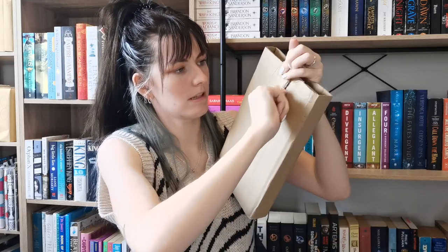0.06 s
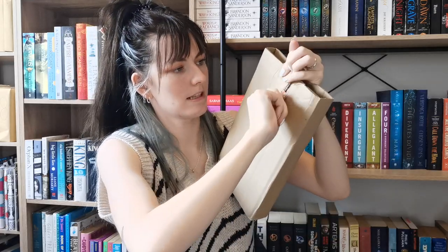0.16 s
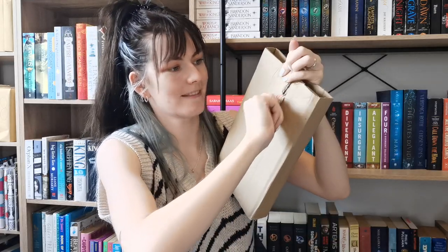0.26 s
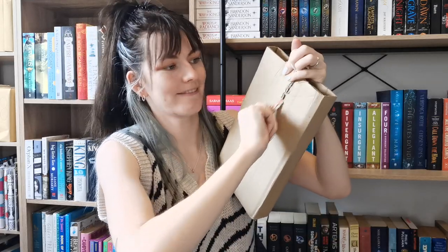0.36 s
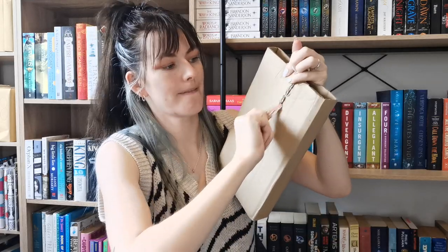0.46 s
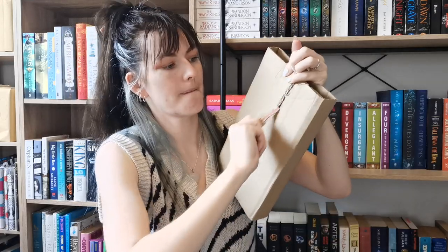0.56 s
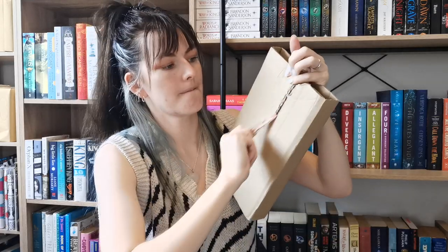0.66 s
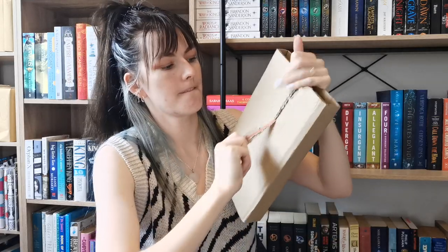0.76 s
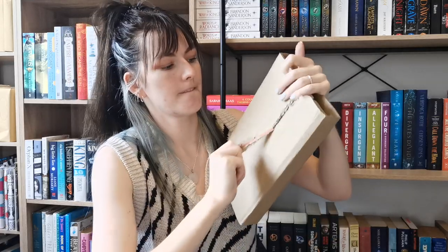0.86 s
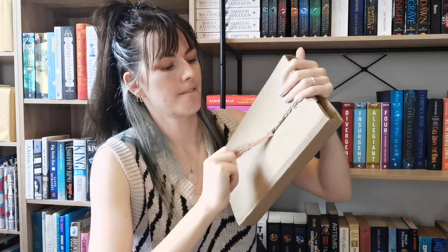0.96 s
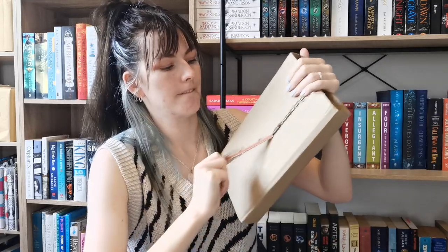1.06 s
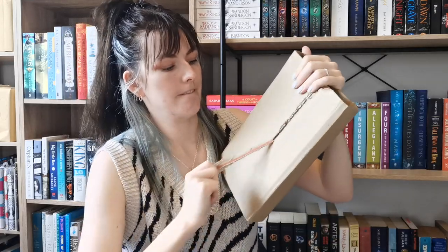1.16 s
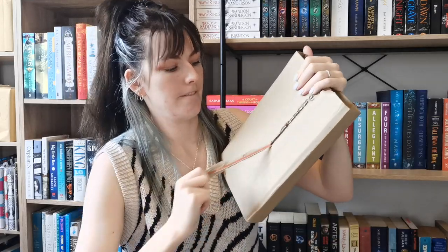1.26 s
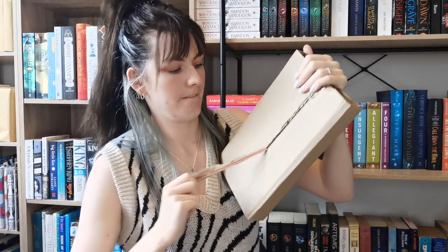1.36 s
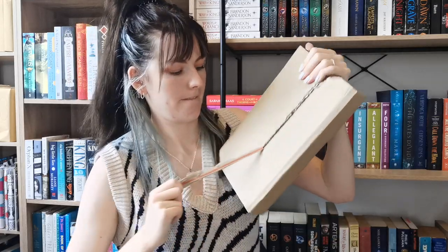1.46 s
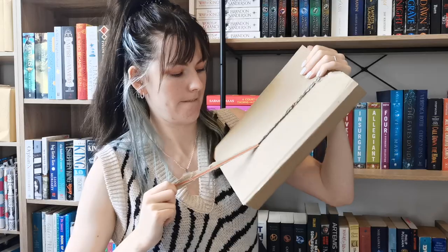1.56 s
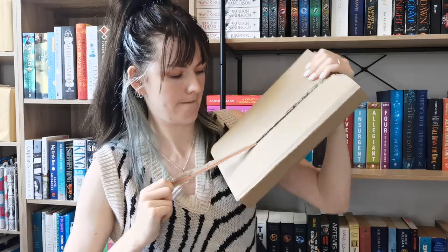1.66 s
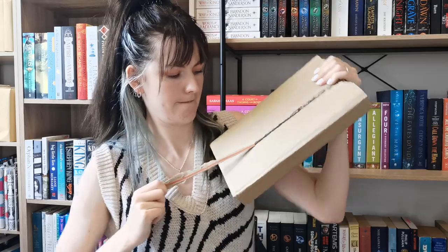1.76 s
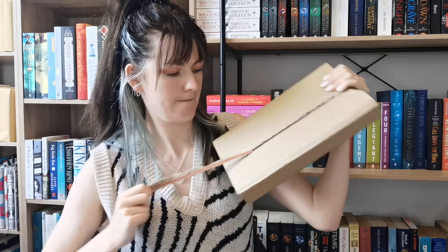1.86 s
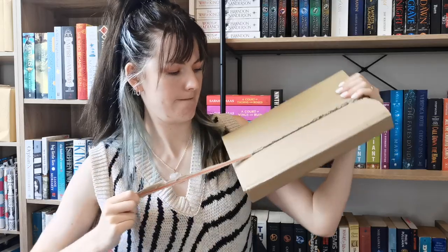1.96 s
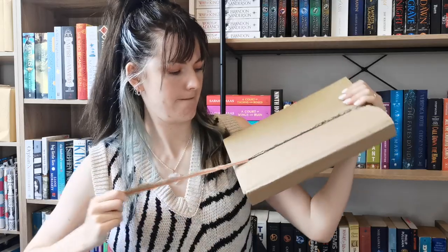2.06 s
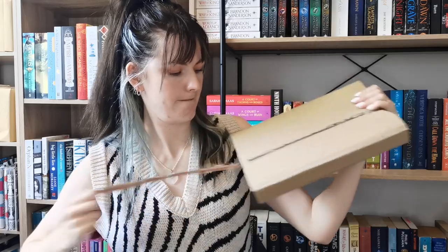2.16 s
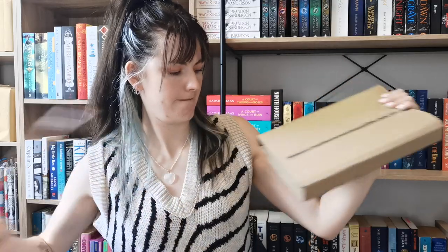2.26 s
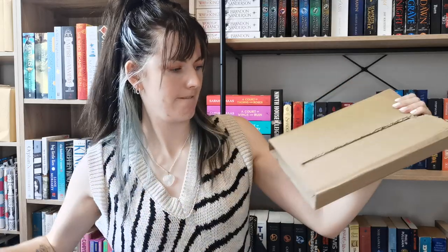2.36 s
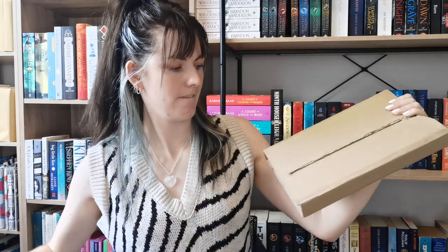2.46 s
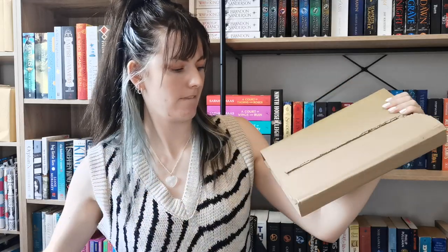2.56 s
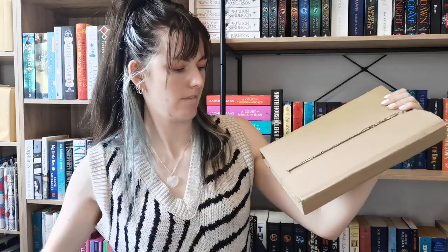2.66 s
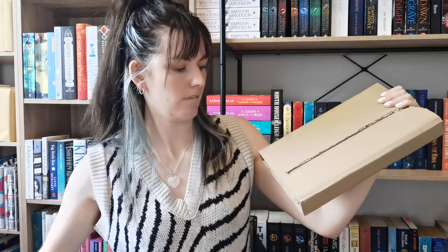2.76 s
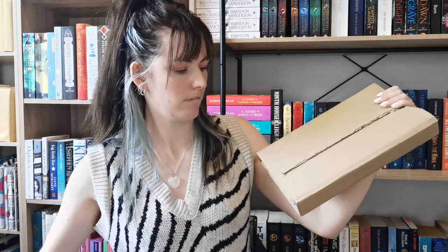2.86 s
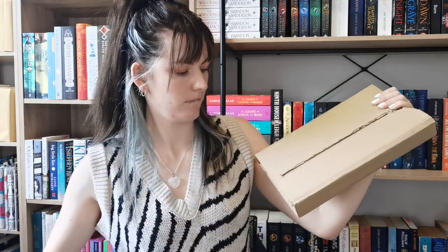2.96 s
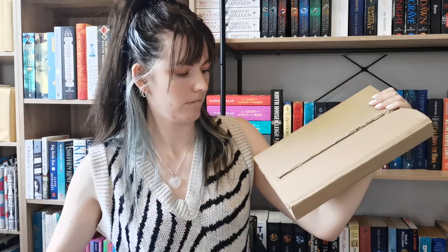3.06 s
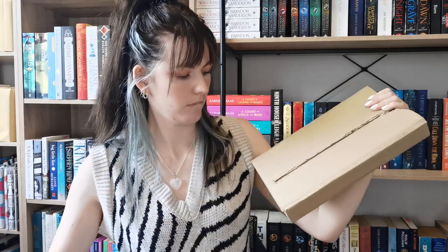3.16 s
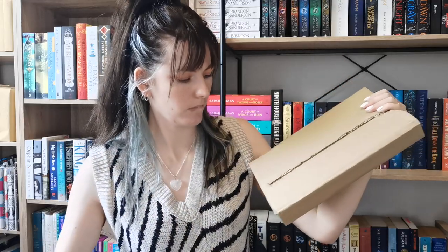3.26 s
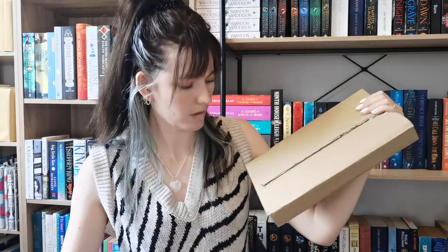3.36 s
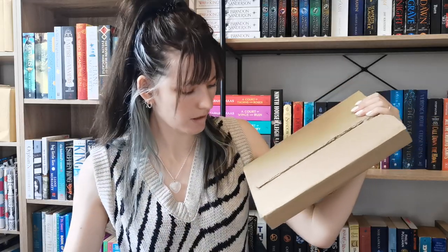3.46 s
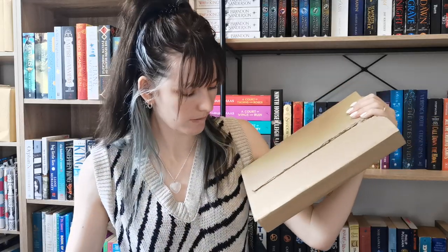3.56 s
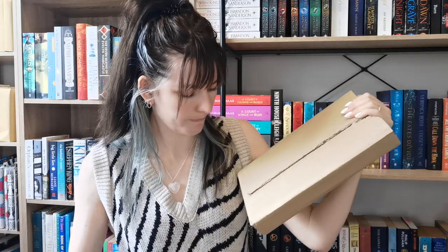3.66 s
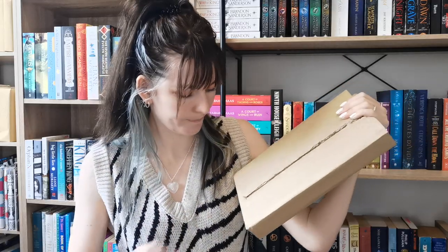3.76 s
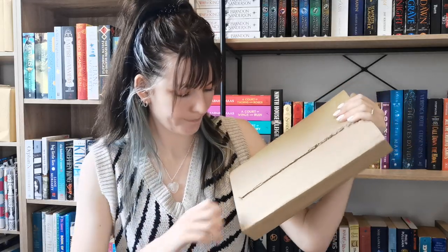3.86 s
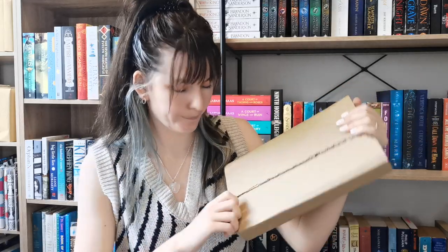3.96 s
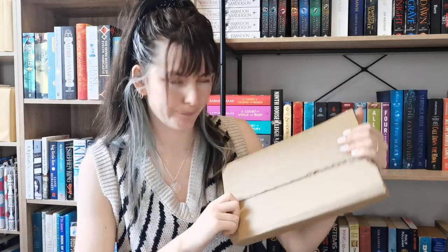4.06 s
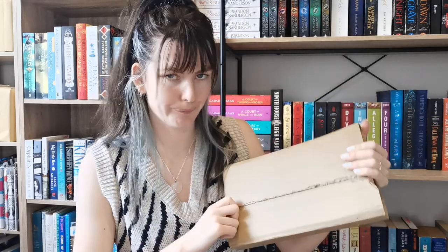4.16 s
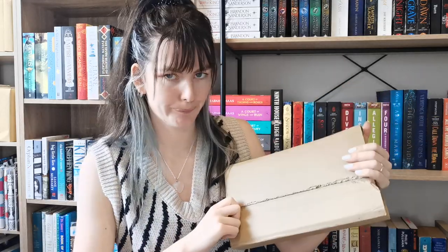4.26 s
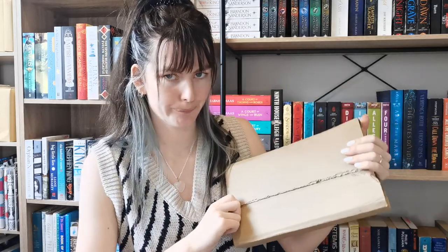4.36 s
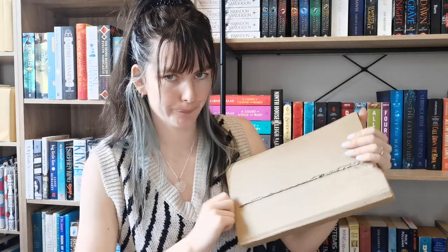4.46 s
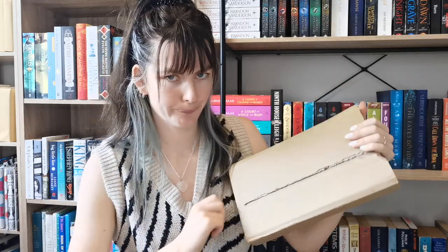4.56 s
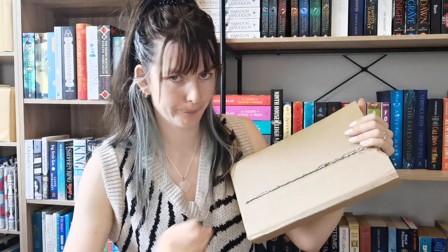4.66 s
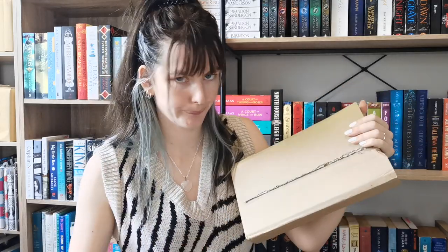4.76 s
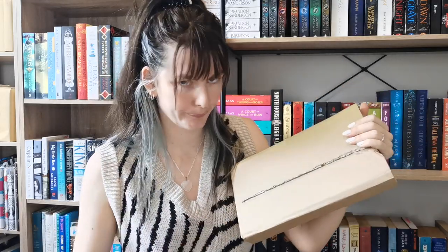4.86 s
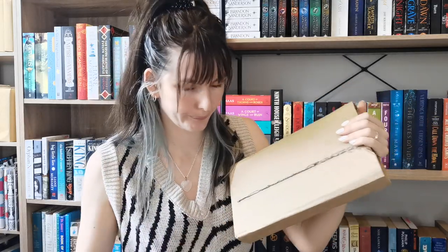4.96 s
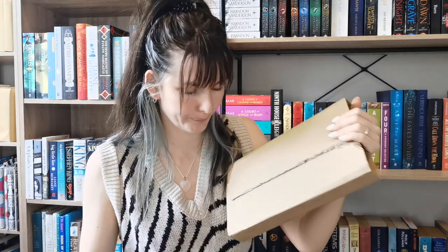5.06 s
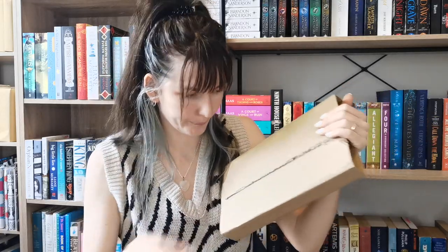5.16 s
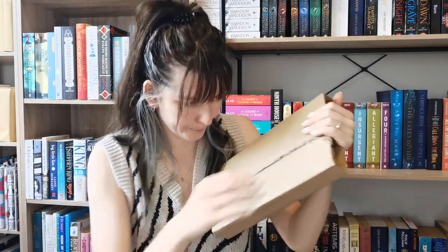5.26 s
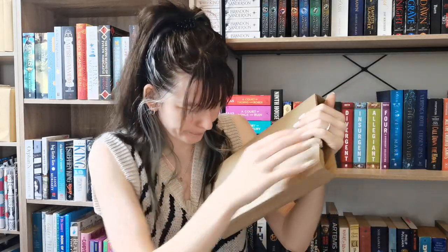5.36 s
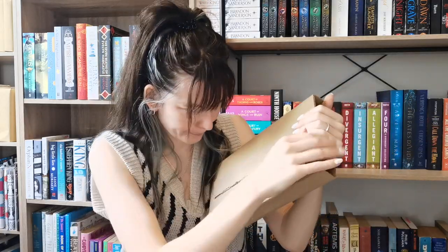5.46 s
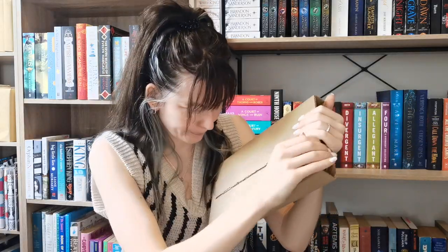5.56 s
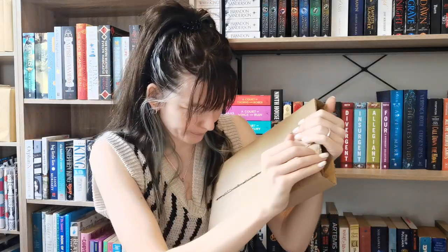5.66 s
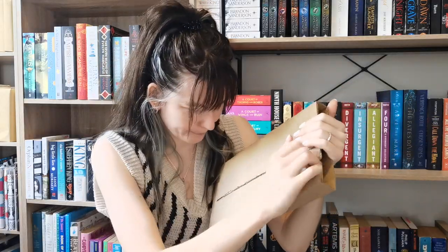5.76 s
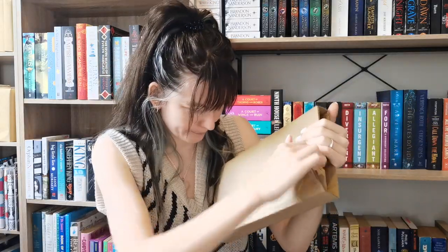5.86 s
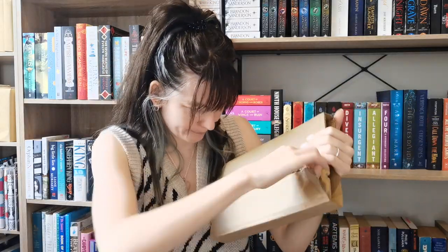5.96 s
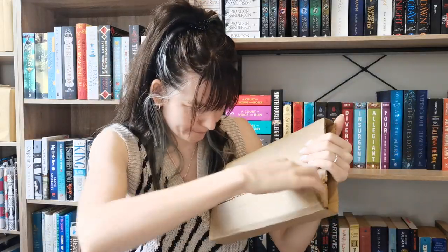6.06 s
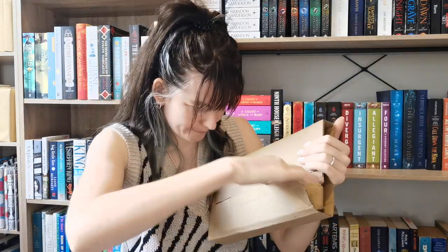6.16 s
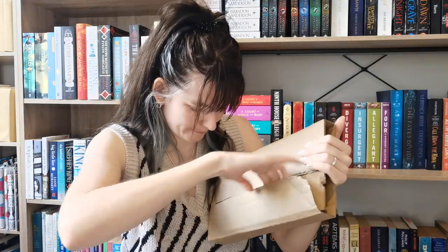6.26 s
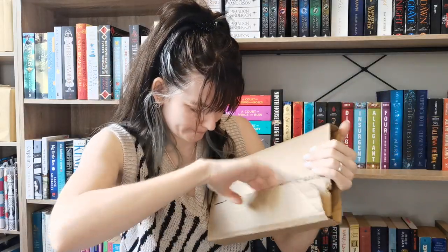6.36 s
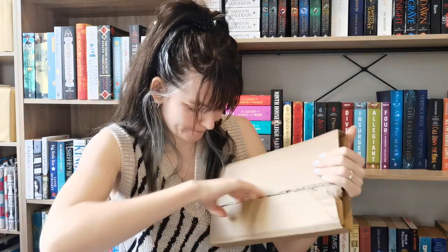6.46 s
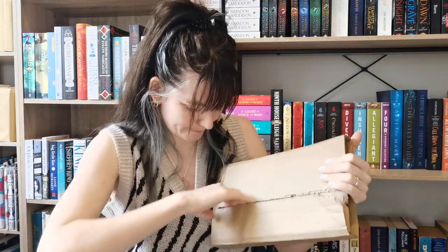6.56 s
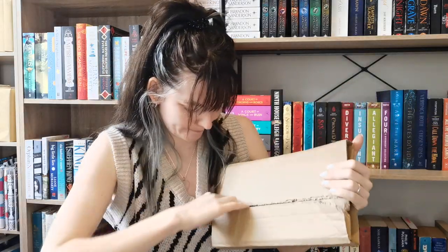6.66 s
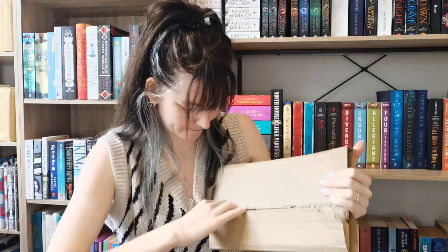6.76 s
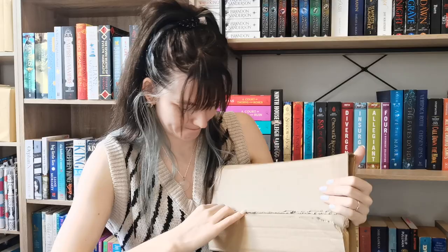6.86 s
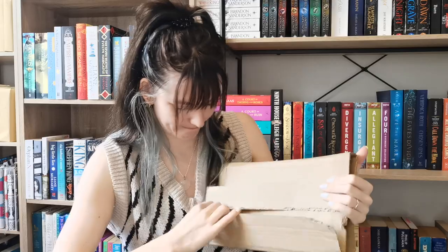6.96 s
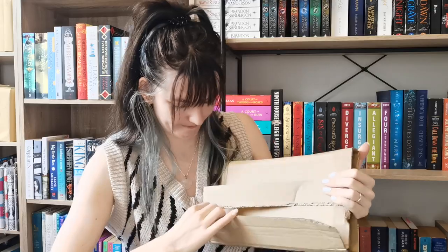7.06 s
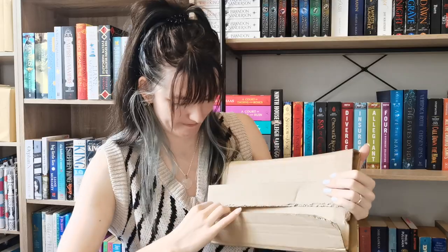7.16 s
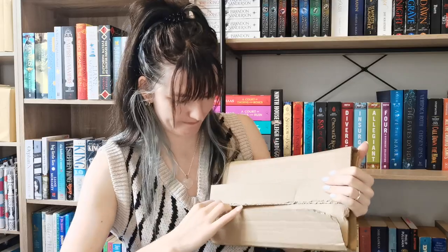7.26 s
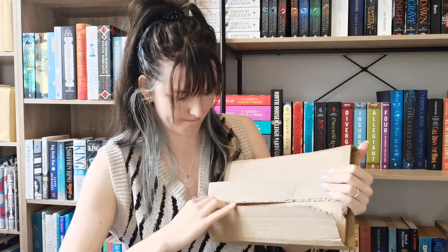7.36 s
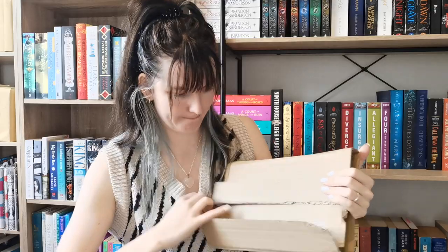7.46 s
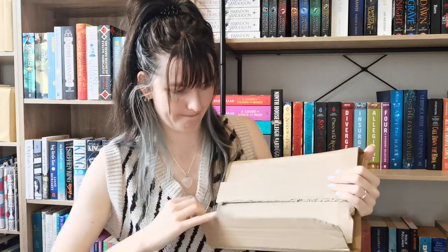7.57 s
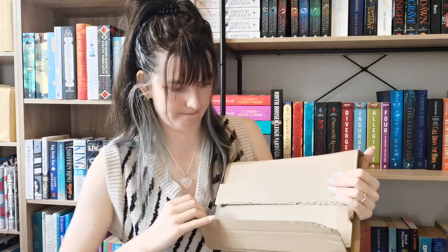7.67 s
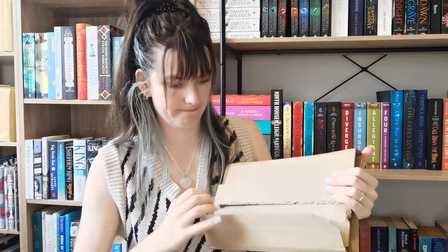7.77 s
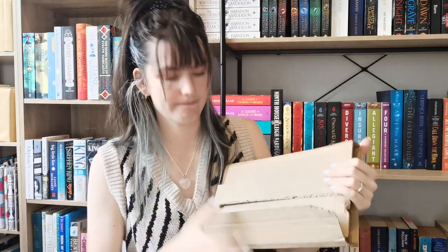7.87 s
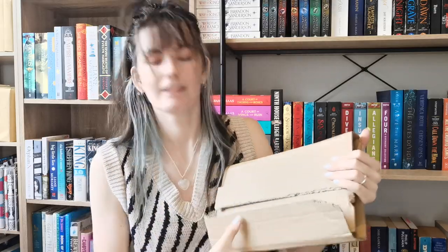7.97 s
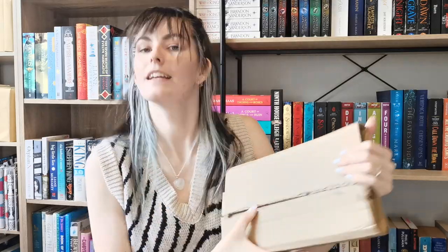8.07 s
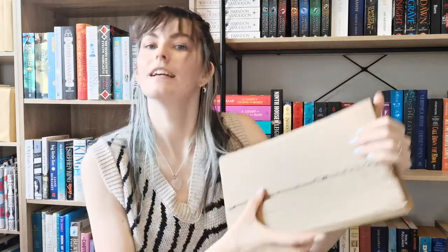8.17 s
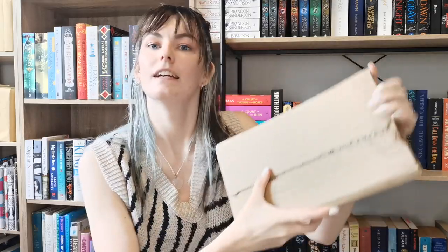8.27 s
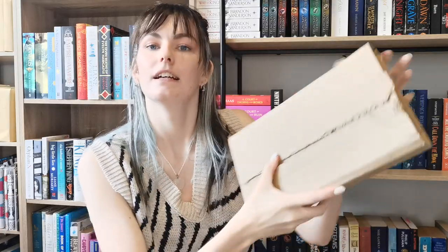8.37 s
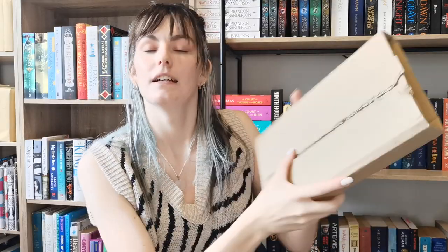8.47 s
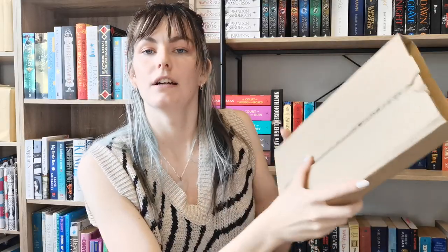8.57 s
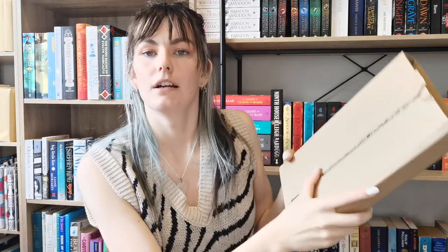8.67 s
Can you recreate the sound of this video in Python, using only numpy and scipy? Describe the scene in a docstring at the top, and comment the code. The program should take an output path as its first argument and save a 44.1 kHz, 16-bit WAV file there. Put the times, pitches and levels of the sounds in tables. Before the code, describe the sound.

Close, crackling rips run along a hollow cardboard box, followed by a light strip's ticking landing, soft rustles, sharp card cracks and dull knocks.

```python
"""The tear strip of a cardboard mailer is ripped off close by, in pulls, in a small furnished room.
Paper fibres snap in dense showers, surging as the ties of the perforation give way one after another;
the hollow box drums, most of all while the tear crosses the soft middle of its panel.
Then hands slide over the card with fine friction grains, and the dropped strip lands in quick ticks.
The flap is prised open with cracks of filtered noise, and the patted box rings. A quiet room lies below."""
import sys
import numpy as np
from scipy import signal
from scipy.fft import rfft, irfft, next_fast_len
from scipy.io import wavfile
from scipy.ndimage import uniform_filter1d

SR = 44100
rng = np.random.default_rng(int(sys.argv[2]) if len(sys.argv) > 2 else 0)


def to_wav(s):
    """Save 16-bit WAV."""
    ch = np.atleast_2d(s).T  # columns
    pcm = np.round(np.clip(ch, -1, 1) * 32767)  # PCM
    wavfile.write(sys.argv[1], SR, pcm.astype(np.int16))


N = 384019

TIME = np.arange(N) / SR
SIZE = next_fast_len(N + SR // 2, True)  # transform length, with space for ringing after the end
FREQ = np.maximum(np.arange(SIZE // 2 + 1) * SR / SIZE, 1)
LEFT_RIGHT = np.array([[1], [-1]])

# colour of the snapping fibres: (f/Hz, level/dB)
FIBRE_COLOUR = [(200, -5.5), (500, -3), (1100, -6), (2000, -2.5), (3200, -2), (4300, 0), (6000, -4.5),
                (7800, -1), (8800, -4), (10200, -0.5), (10700, 4.5), (11600, -4.5), (12700, -4),
                (16000, -15.5)]
# ringing of the hollow panel under the tear: (f/Hz, width/Hz, level/dB)
PANEL_MODES = [(73, 3.1, -4), (99.6, 7.6, -4), (150.7, 54, -3.5), (226.5, 19, 3.5), (258, 15, 7.5),
               (290, 28, -1.5), (353, 23, -8), (495, 19, -2.5), (640, 80, -34)]
# the panel drums most while the tear crosses its soft middle: (t/s, drumming relative to the pull/dB)
DRUMMING_LEVEL = [(.15, -38.5), (.2, -9.5), (.45, -11), (.75, -7), (.95, -4), (1.11, -5), (1.17, 5),
                  (1.28, 6), (1.4, -0.5), (1.45, 9), (1.66, 4), (1.8, -4.5), (1.95, -5), (2.04, -4.5),
                  (2.2, -18.5), (2.29, -12)]


def tear():
    """Fibres snap as the strip is pulled, in surges at each tie; coarser slips drum on the panel."""
    slips = grains(rate=650, spread_db=1.54)
    # each slip lets a short shower of fibres go
    shower = unit(decay(np.abs(slips), decay_s=0.0037) + 3.0)
    # now and then a whole bundle snaps within a millisecond
    bundles = unit(decay(np.abs(grains(rate=130, spread_db=3.0)), decay_s=0.000073))
    # fibres still tick between pulls
    slack = undb(-59) * (TIME < PULLS[-1][1])
    pulled = pull_force(release=0.0079) * (shower + undb(-15.5) * bundles)
    force = np.hypot(pulled + slack * bundles, jerks())
    snaps = two_ports(lambda: force * grains(rate=14000, spread_db=0.6), alike_hz=3940)
    fibres = shape(snaps, unit(colour(FIBRE_COLOUR)))

    # the broad panel cannot follow the fastest slips
    panel = unit(shape(slips, modes(PANEL_MODES) / (1 + 1j * FREQ / 900)))
    drum_gain = undb(np.interp(TIME, *np.transpose(DRUMMING_LEVEL)))
    # its lowest mode flexes with every pull, less as the slit grows
    flex = unit(shape(slips, modes(PANEL_MODES[:1])))
    flex_gain = undb(-11.5 - 7.5 * TIME)
    # the panel settles more slowly than the fibres
    drumming = pull_force(release=0.015) * (drum_gain * panel + flex_gain * flex)
    return fibres + drumming


# the pulls on the strip: (start t/s, end t/s, fibre level/dB, swell from start to end/dB,
# level of the ties' snap/dB before its jerk shape, ties per second/Hz)
PULLS = [(0, 0.022, -53, -21, -42, 30), (0.139, 0.2, -38.5, -6, -35, 24),
         (0.35, 0.519, -41.5, 2, -25, 35.6), (.616, 0.833, -43.5, 5, -24.5, 21.6),
         (0.908, 0.972, -43.5, -7, -38, 20), (1.035, 1.426, -40.5, -4, -39.5, 38),
         (1.43, 1.622, -37.5, -1.5, -44.5, 37), (1.647, 1.697, -46, -8, -54.5, 37),
         (1.785, 1.922, -46.5, 10.5, -37.5, 23), (1.925, 2.088, -38, -3, -44, 25),
         (2.077, 2.185, -45, 6.5, -42, 43), (2.179, 2.294, -38, -7, -38, 35)]


def pull_force(release):
    """Tension in the strip: the strongest pull at each moment, easing off over the release time (s)."""
    return np.max([gesture(*row[:4], 0.013, release) for row in PULLS], axis=0)


# the strip catches hard and jerks free: (t/s, level/dB before the jerk shape)
SNAGS = [(0.186, -28), (.776, -27.5), (.828, -41), (.947, -29), (1.068, -35), (1.997, -26.5), (2.274, -22)]


def jerks():
    """The ties of the perforation give way one after another during each pull; a few catch hard."""
    attack_s, decay_s = 0.0021, 0.0052
    jitter_s, scatter_db, fade_db_per_s = 0.00155, 2.5, 14.5
    out, age = np.zeros(N), np.arange(SR // 10) / SR
    jerk = (1 - np.exp(-age / attack_s)) * np.exp(-age / decay_s)
    for start, end, _, _, db, rate in PULLS:
        tie_times = np.arange(0, end - start, 1 / rate)
        for since, (late, strong) in zip(tie_times, rng.standard_normal(size=(32, 2))):
            # the first tie is on time; later ones wander
            moment = start + since + jitter_s * late * (since > 0)
            # the first ties of a pull hold hardest
            level = db - fade_db_per_s * since + scatter_db * strong
            add(out, moment, undb(level) * jerk)
    for s, db in SNAGS:
        add(out, s, undb(db) * jerk)
    return out


# colour of cracking card: (f/Hz, level/dB)
CARD_COLOUR = [(200, -23.5), (500, -8), (1100, -6.5), (1500, -8), (2100, 0.5), (2700, -3), (3150, 0),
               (3650, -4.5), (4200, 0), (6000, -8), (8000, -6.5), (9000, -13), (10700, -10), (16000, -29.5)]
# the card buckles or is knocked, heard as a crack and a thump: (t/s, crack level/dB, crack length/s,
# crack brightness/(dB per octave), thump level/dB, thump pitch f/Hz)
BLOWS = [(4.084, -44, 0.003, 15, -46, 673), (5.548, -65, 0.0049, 0, -60.5, 415),
         (5.647, -57, 0.015, 0.5, -56.5, 1010), (5.965, -41, 0.0087, -1, -57, 1030),
         (5.973, -36.5, 0.0073, -2, -46, 1090), (6.1066, -35.5, 0.012, 7, -56, 700),
         (6.129, -23, 0.0052, 1, -35.5, 282), (6.148, -35.5, .022, 0.5, -51, 390),
         (6.22, -26.5, .0061, -3.5, -35, 387), (6.321, -25.5, 0.0019, 0, -47, 810),
         (6.452, -47, 0.0015, -10, -46.5, 710), (6.472, -37, 0.0034, -10.5, -59, 510),
         (6.921, -45.5, .0021, -6, -59, 670), (6.969, -17, 0.0016, -0.5, -57, 800),
         (7.053, -19.5, 0.0063, -1, -32, 308), (7.221, -52, 0.0066, 5, -48.5, 610),
         (7.552, -31, 0.0052, -5.5, -40.5, 710), (7.56, -29, 0.0074, 3, -35, 265),
         (7.699, -54.5, 0.025, -9.5, -60, 840), (8.007, -54, 0.0017, 12, -84, 700),
         (8.126, -56.5, .006, 17, -45, 400), (8.143, -34.5, 0.0052, -7, -21, 454),
         (8.148, -53, 0.011, 5, -45, 108), (8.322, -44.5, .007, 2, -54, 446),
         (8.365, -44, 0.0065, -4.5, -47.5, 265), (8.637, -41.5, 0.0027, 12.5, -73, 700),
         (8.666, -64, .006, 4, -41.5, 266)]


def cracks():
    """The card buckles in short clusters of breaking fibres."""
    out = np.zeros(N)
    for s, crack_db, length, tilt_db, _, _ in BLOWS:
        add(out, s, undb(crack_db) * burst(length, CARD_COLOUR, tilt_db))
    return out


def burst(length, points, tilt_db=0, size=4096):
    """A cluster of fibres giving way within about the given time (s), as shaped and coloured noise."""
    age = np.arange(size) / SR
    freq = np.maximum(np.arange(size // 2 + 1) * SR / size, 1)
    length = max(length, 1 / SR)
    progress = age / length
    main_break = progress * np.exp(-(progress / 0.48) ** 2)
    # the crease goes on crunching faintly as it relaxes
    crunch = 0.0035 * np.exp(-age / 0.016)
    snaps = rfft((main_break + crunch) * rng.choice([-1, 1], size))
    octaves = np.log2(np.clip(freq, 700, 12000) / 3000)
    gain = colour(points, freq) * undb(tilt_db * octaves)
    # however few fibres break, they excite the whole range of the card
    gain = gain / np.sqrt(uniform_filter1d(np.abs(snaps) ** 2, size=128))
    # minimum phase: no sound ahead of the snap
    cepstrum = irfft(np.log(gain + 1e-6))
    causal = np.exp(rfft(2 * cepstrum[:size // 2], size))
    # total energy as if it held rms 1 for the given length
    return unit(irfft(snaps * causal)) * np.sqrt(length * SR / size)


def thumps():
    """Each buckle or knock also pushes the hollow box."""
    out = np.zeros(N)
    for s, _, _, _, thump_db, hz in BLOWS:
        add(out, s, undb(thump_db) * thump(hz))
    return out


# ringing of the opened box: (f/Hz, width/Hz, level/dB)
BOX_MODES = [(133.5, 17, 7), (247.3, 27, 4), (337, 25, 0), (450, 200, -5.5), (508, 22, 3.5),
             (620, 39, -3.5), (740, 90, -5), (855, 40, -0.5), (1300, 750, -2.5)]


def thump(hz, size=8192):
    """The box rings after a push; a softer contact has a lower pitch and wakes lower modes."""
    freq = np.maximum(np.arange(size // 2 + 1) * SR / size, 1)
    push = modes([(hz, 0.68 * hz, 0)], freq) ** 2
    ring = irfft(push * modes(BOX_MODES, freq))
    # total energy as if it held rms 1 for 10 ms
    return unit(ring) * np.sqrt(SR / 100 / size)


# colour of skin on card: (f/Hz, level/dB)
SKIN_COLOUR = [(100, -24.5), (240, -6), (550, -8.5), (1000, -11), (2200, -9.5), (3000, -10.5), (4300, -7.5),
               (6000, -13), (8000, -11.5), (9000, -14.5), (10700, -9), (16000, -27)]
# skin and card sliding: (start t/s, end t/s, level/dB, swell from start to end/dB,
# brightness/(dB per octave))
STROKES = [(3.291, 3.47, -69.5, -20, 11), (3.774, 4.007, -68.5, 9, -1), (3.982, 4.095, -54.5, 20.5, -1),
           (4.1, 4.227, -63.5, -5, 2), (4.29, 4.5, -75.5, 6, 2), (4.499, 4.578, -51.5, 15.5, 4.5),
           (5.13, 5.45, -79, 4, -1), (5.63, 5.791, -56.5, 20, -1), (5.865, 6.11, -61, 2, 0),
           (6.115, 6.243, -40.5, -8.5, 0), (6.302, 6.442, -48.5, 7.5, -3.5), (6.445, 6.727, -48, -12, -2),
           (6.774, 6.905, -60.5, -2, -2.5), (6.91, 7.055, -50, 6, -3), (7.055, 7.11, -36.5, -5, 0),
           (7.14, 7.24, -53.5, 3, -19), (7.427, 7.553, -53, -7, -3.5), (7.552, 7.609, -39.5, -10, -17),
           (7.626, 7.88, -71, -8, 1), (8.048, 8.137, -62, 23, -3.5), (8.135, 8.225, -46.5, 3, -4.5),
           (8.246, 8.349, -49.5, 5, -2), (8.35, 8.57, -59, -9, -1), (8.56, 8.71, -55, 9, -2.5)]


def rubbing():
    """Fine friction grains with a few small catches; each stroke mixes its dull and bright parts."""
    half_span_octaves = 1.38  # from the middle of the spectrum to its dull and bright parts

    def friction():
        catches = grains(rate=200, spread_db=10.5)
        return grains(rate=14000, spread_db=1.0) + undb(-7) * catches

    sound = unit(shape(two_ports(friction, alike_hz=3500), colour(SKIN_COLOUR)))
    dull = shape(sound, 1 / (1 + (FREQ / 2500) ** 2))
    low, high = 0, 0
    for start, end, db, swell_db, tilt_db in STROKES:
        bright = undb(tilt_db * half_span_octaves)
        force = gesture(start, end, db, swell_db, attack=0.021, release=0.016)
        # brightness should not make the stroke much louder
        force = force / np.sqrt((bright ** 2 + bright ** -2) / 2)
        low = np.maximum(low, force / bright)
        high = np.maximum(high, force * bright)
    return low * dull + high * (sound - dull)


# a stiff patch of card sings as it buckles or something drags over it:
# (t/s at the loudest, half length/s, level/dB, pitch f/Hz)
SCRAPES = [(0.481, 0.035, -44.5, 1710), (0.764, 0.072, -47.5, 1680), (1.075, 0.01, -38, 800),
           (1.118, 0.012, -39.5, 790), (1.209, 0.096, -48.5, 755), (2.233, .054, -48.5, 695),
           (3.959, 0.19, -71, 1890), (4.643, 0.073, -67, 1000), (5.766, 0.035, -51, 1050),
           (5.979, 0.012, -41.5, 1310), (6.142, 0.022, -38.5, 1220), (6.462, 0.013, -41.5, 1820),
           (6.617, 0.2, -63.5, 2280), (6.97, 0.0021, -28.5, 2990), (7.457, .018, -59.5, 1010),
           (7.707, 0.012, -49, 727), (8.459, 0.099, -63.5, 1786)]


def scrapes(size=32768):
    """Stick-slip grains ring one broad resonance of the card for the length of a stroke."""
    out, offset = np.zeros(N), (np.arange(size) - size // 2) / SR
    for s, half, db, hz in SCRAPES:
        ring = grains(rate=2500, spread_db=4.0, size=size)
        for sharpness in (3.5, 1.2):
            ring = signal.lfilter(*signal.iirpeak(hz, sharpness, fs=SR), ring)
        swell = np.exp(-(offset / half) ** 2)
        add(out, s + offset[0], undb(db) * swell * unit(ring))
    return out


# colour of the light paper strip: (f/Hz, level/dB)
STRIP_COLOUR = [(200, -51), (400, -14), (800, -19), (1600, -13), (2900, -12), (3600, -4.5), (5500, 0.5),
                (6800, 1), (7400, 5), (8100, -1), (9200, -11.5), (11500, -13.5), (16000, -39)]
# the dropped strip touches down: (t/s, level/dB, length/s)
LANDING = [(3.497, -50, .008), (3.512, -37.5, 0.018), (3.522, -29.5, .0038), (3.527, -28, 0.0016)]


def dropped_strip():
    """The light paper strip brushes a surface and lands in quick ticks, each a burst of noise."""
    out = np.zeros(N)
    for s, db, length in LANDING:
        add(out, s, undb(db) * burst(length, STRIP_COLOUR))
    return out


def room(x, balance, wet_db, t60, count=3, size=16384):
    """Direct sound, a little earlier at the right port, then the short tail of the furnished room."""
    port_lag_s, reflections_last_s = 0.00007, 0.13
    age = np.arange(size) / SR
    fade = np.clip((age - 0.002) / 0.00067, 0, 1) * undb(-60 * age / t60)
    noise, echo = diffuse_noise(alike_hz=1200), 0
    for k in range(count):
        # as the box moves, one pattern of reflections gives way to the next, in turn
        offset = (TIME / reflections_last_s - k + 1) % count - 1
        share = np.cos(np.pi / 2 * np.clip(offset, -1, 1))
        tail = unit(noise[:, k * size:(k + 1) * size] * fade) / np.sqrt(size)
        echo = echo + signal.oaconvolve(x * share, tail, axes=-1)[:, :N]
    # the close box outweighs the room in the bass
    wet = undb(wet_db) * FREQ / np.hypot(FREQ, 420)
    lag = np.exp(-1j * np.pi * FREQ * (1 + LEFT_RIGHT) * port_lag_s)
    ratio = colour(balance)
    # left and right share the power; direct sound and echo together keep it
    ports = np.sqrt(2 * ratio ** LEFT_RIGHT / (ratio + 1 / ratio) / (1 + wet ** 2))
    return shape(x, lag * ports) + shape(echo, wet * ports)


# colour of the quiet room: (f/Hz, level/dB)
QUIET_COLOUR = [(20, -4), (34, -0.5), (50, -10.5), (120, -15), (250, -23), (500, -30), (1000, -31.5),
                (2000, -37.5), (4500, -41), (7500, -50), (10700, -47.5), (16000, -55)]


def background():
    """Low rumble and faint hiss of the quiet room, as coloured noise."""
    return undb(-61.5) * unit(shape(diffuse_noise(alike_hz=690), colour(QUIET_COLOUR)))


def diffuse_noise(alike_hz):
    """Noise that arrives from all sides."""
    return two_ports(lambda: rng.standard_normal(N), alike_hz)


def two_ports(make, alike_hz):
    """Two draws of a sound, shared by two close ports: alike in the bass, unrelated in the treble."""
    apart = np.sqrt((FREQ ** 2 + (alike_hz / 8) ** 2) / (FREQ ** 2 + alike_hz ** 2))
    common = shape(make(), 1 / np.sqrt(1 + apart ** 2))
    difference = shape(make(), apart / np.sqrt(1 + apart ** 2))
    return common + LEFT_RIGHT * difference


def gesture(start, end, db, swell_db, attack, release):
    """Force of one hand movement: it takes hold, grows or eases steadily, and lets go."""
    progress = np.clip((TIME - start) / (end - start), 0, 1)
    take_hold = np.clip((TIME - start) / attack, 0, 1)
    let_go = np.exp(-np.maximum(TIME - end, 0) / release)
    return take_hold * let_go * undb(db + swell_db * (progress - 0.5))


def grains(rate, spread_db, size=N):
    """Random clicks, many small and a few large, at about the given rate per second; rms 1."""
    where = np.flatnonzero(rng.random(size) < rate / SR)
    strength = undb(spread_db * np.minimum(rng.exponential(size=len(where)), 4))
    clicks = np.zeros(size)
    clicks[where] = strength * rng.choice([-1, 1], len(where))
    return unit(clicks)


def decay(x, decay_s):
    """Let every click die away exponentially."""
    return signal.lfilter([1], [1, -np.exp(-1 / (decay_s * SR))], x)


def undb(db):
    """Decibels to gain."""
    return 10 ** (np.asarray(db) / 20)


def unit(x):
    """Scale to rms 1."""
    return x / np.sqrt(np.mean(x ** 2))


def colour(points, freq=FREQ):
    """Gain at each frequency, read between the points of a (f/Hz, level/dB) table."""
    hz, db = np.transpose(points)
    return undb(np.interp(np.log(freq), np.log(hz), db))


def modes(table, freq=FREQ):
    """Complex response of a set of (f/Hz, width/Hz, level/dB) resonances."""
    return sum(undb(db) / (1 + 1j * (freq ** 2 - hz ** 2) / (freq * width))
               for hz, width, db in table)


def shape(x, gain):
    """Pass a sound through a frequency response."""
    return irfft(rfft(x, SIZE) * gain)[..., :N]


def add(track, s, sound):
    """Mix a short sound in at time s, in seconds."""
    start = max(int(s * SR), 0)
    track[start:start + len(sound)] += sound[:N - start]


# the two ports hear the tear's treble differently: (f/Hz, left minus right level/dB)
TEAR_BALANCE = [(300, 1), (2400, -1), (4400, 0.5), (6000, 0.5), (8000, 6.5), (9200, -3), (10700, -17),
                (12000, -2.5), (15000, -7)]
# the same for the handling: (f/Hz, left minus right level/dB)
HANDLING_BALANCE = [(120, 5), (500, 2), (1300, 2), (4000, 0.5), (6500, 3), (8000, 11), (9400, -12.5),
                    (12500, -4.5), (15000, -2.5)]


def scene():
    """The tear and the handling sound in the same room from slightly different places."""
    ripping = room(tear(), TEAR_BALANCE, wet_db=-2.0, t60=0.22)
    ticks = two_ports(lambda: cracks() + dropped_strip(), alike_hz=4500)
    touches = rubbing() + scrapes() + thumps() + ticks
    handling = room(touches, HANDLING_BALANCE, wet_db=-2.5, t60=0.25)
    return ripping + handling + background()


def record(dry):
    """A steep low-pass filter removes the top of the treble, above 15.9 kHz."""
    low_pass = signal.ellip(10, 0.2, 80, 15900, fs=SR, output="sos")
    return signal.sosfilt(low_pass, dry)


dry = scene()
out = record(dry)
to_wav(out)
```